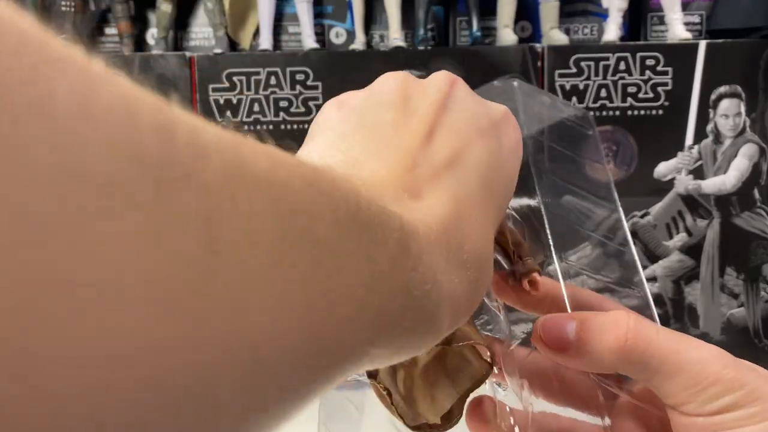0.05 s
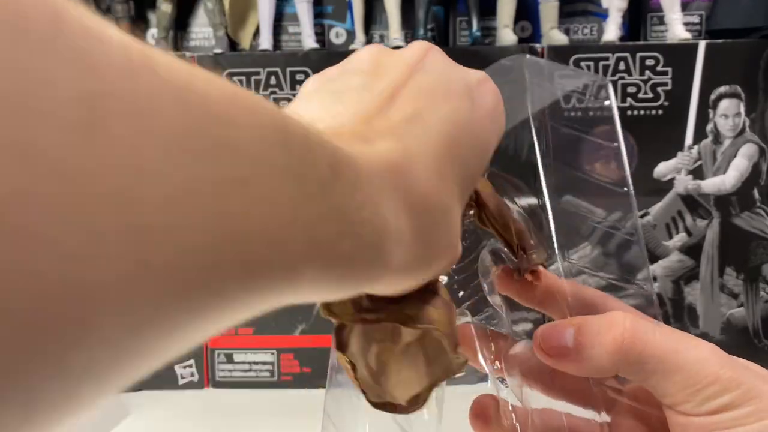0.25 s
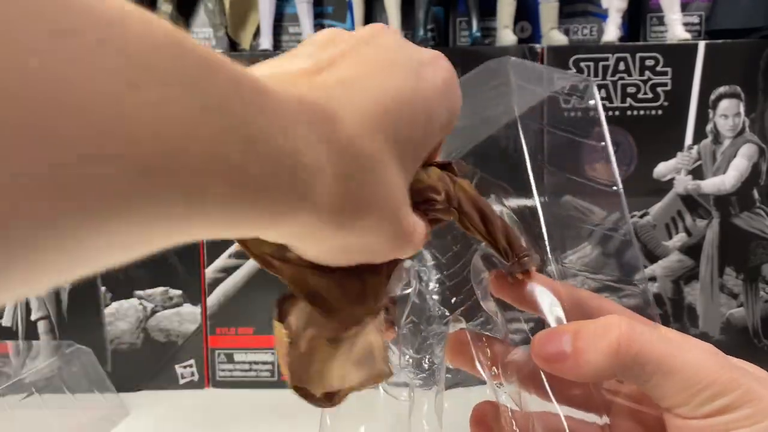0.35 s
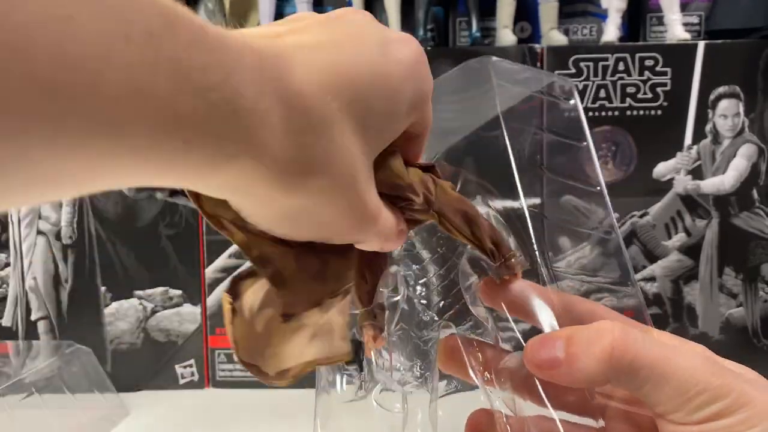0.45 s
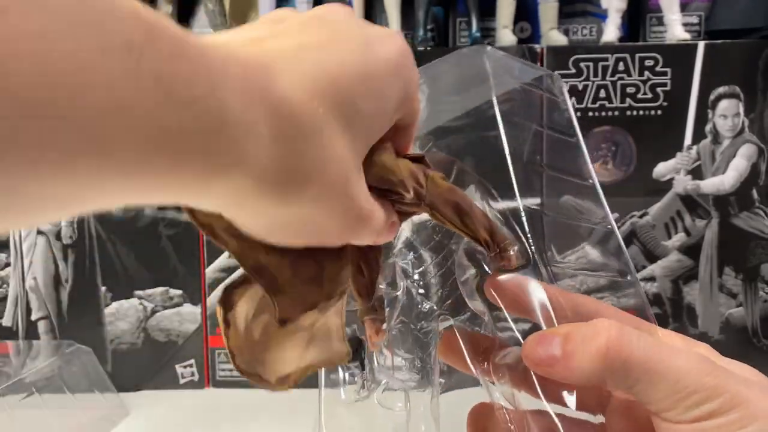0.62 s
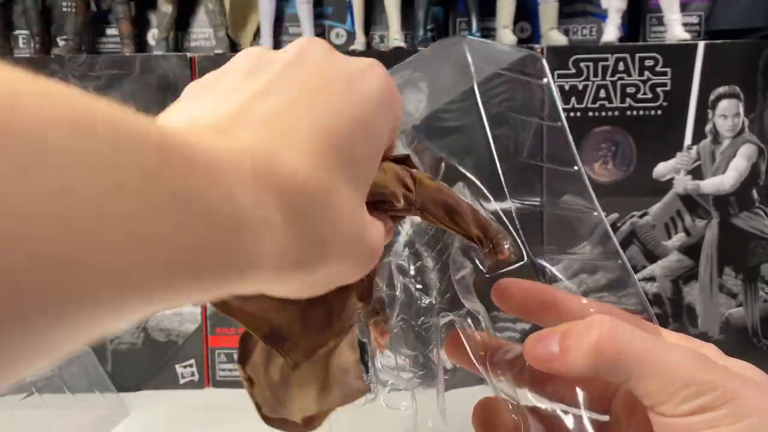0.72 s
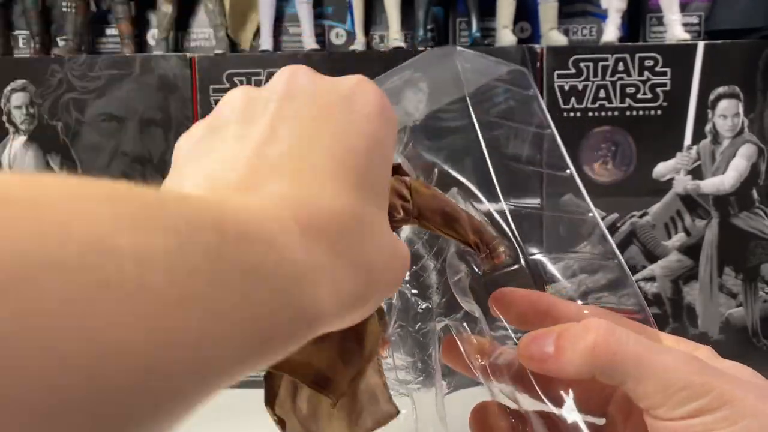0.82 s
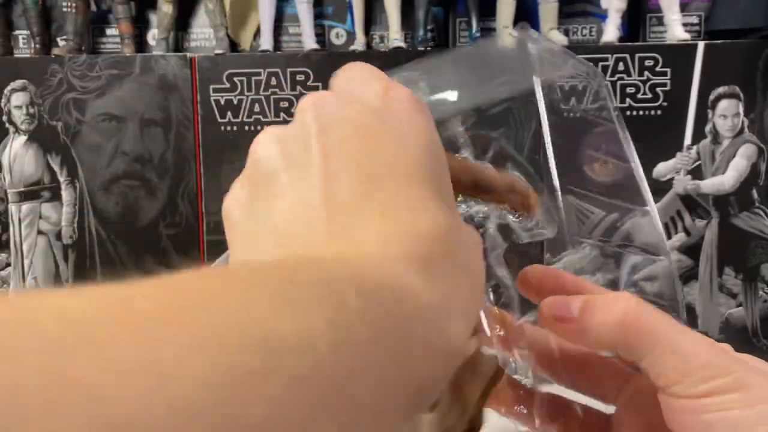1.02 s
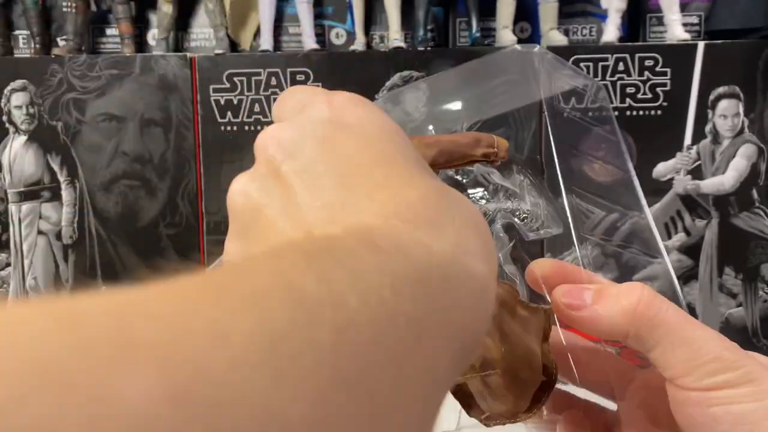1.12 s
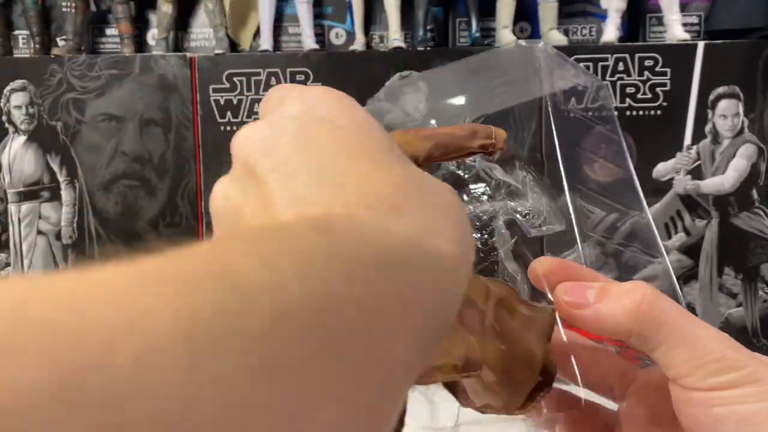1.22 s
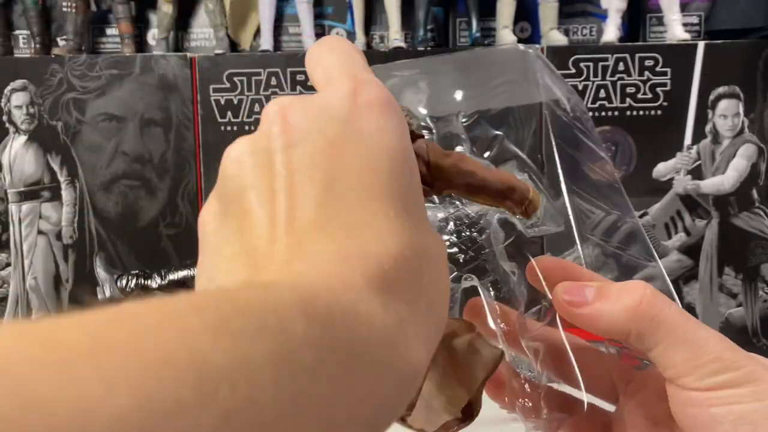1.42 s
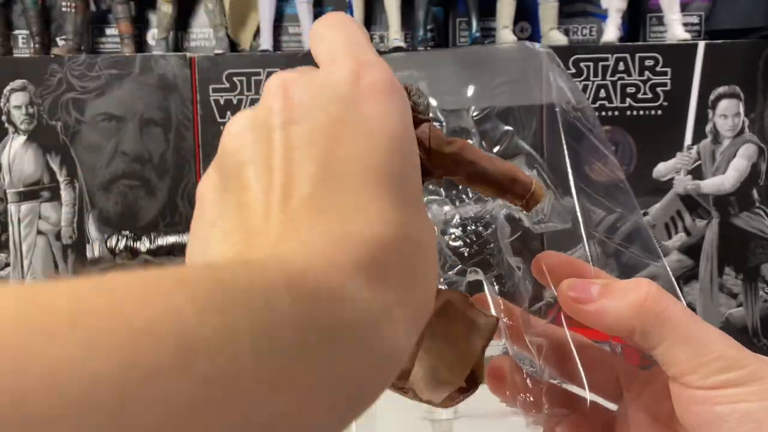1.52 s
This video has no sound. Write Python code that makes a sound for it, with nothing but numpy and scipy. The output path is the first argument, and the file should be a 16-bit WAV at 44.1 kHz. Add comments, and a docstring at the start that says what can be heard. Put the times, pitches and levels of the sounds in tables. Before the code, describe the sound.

A thin, stiff plastic tray crackles close to the microphone in a small quiet room. Faint ticks lead to one hard, by far loudest snap at 0.25 s. Smaller pops follow, crowding with creaks from 0.55 to 1.05 s, with a faint low rubbing drone until about 0.85 s. Then sparse clicks, one clear and bright at 1.25 s, over soft rumble, hum and hiss.

```python
"""A thin clear plastic tray is bent and pulled close to a microphone in a small quiet room.
From the start, dents snap through and ring the tray's modes, the strongest at a quarter second.
Between snaps the sheet creaks in dense tiny slips; after half a second a low rub drones and glides.
The snaps thin out over the last half second. Each sound leaves a room tail, modelled as decaying noise.
Rumble, a low wavering hum and microphone hiss lie underneath throughout."""
import sys
import numpy as np
from scipy import signal
from scipy.fft import rfft, irfft
from scipy.io import wavfile

SR = 44100
rng = np.random.default_rng(int(sys.argv[2]) if len(sys.argv) > 2 else 0)


def to_wav(s):
    """Save 16-bit WAV."""
    ch = np.atleast_2d(s).T  # columns
    pcm = np.round(np.clip(ch, -1, 1) * 32767)  # PCM
    wavfile.write(sys.argv[1], SR, pcm.astype(np.int16))


def linear_from_db(decibels):
    """Turn decibels (scalar or array-like) into linear amplitude factors; 0 gives 1."""
    return 10 ** (np.asarray(decibels, float) / 20)


N = 68355  # samples, 1.55 s

# Dents snapping through. Each row: start in seconds (plus the short delay below), peak of the body ring in dB,
# then hollow ring, upper ring and bright crack in dB over their first 10 ms against that peak.
SNAP_EVENTS = [(0.0014, -53, -38, -15, -18), (0.0184, -46, -14, -22, -2), (0.0224, -42, -10.5, -17, -9),
               (0.0483, -34.5, -15, -39, -20.5), (0.0574, -43, -31, -17, -11),
               (0.0672, -31.5, -17, -16, -18), (0.1231, -45, -7, -8.5, -22), (0.1416, -35, -11, -35, -25),
               (0.17, -33, -14, -12.5, -18.5), (0.2019, -29, -24, -18, -19.5),
               (0.2433, -2.5, -30, -12.5, -17), (0.2764, -33, -51, -13, 5), (0.2844, -40.5, -31, 7, 9.5),
               (0.3654, -29.5, -22.5, -2, -2.5), (0.3935, -18.5, -10.5, -16.5, -31),
               (0.3974, -33, -5.5, 1.5, -13), (0.4384, -38, -22, -16, -12.5),
               (0.5033, -39.5, -13.5, -14, -17.5), (0.5544, -29, -7, -17, -29),
               (0.5641, -24.5, -10.5, -43, -28), (0.5931, -33.5, -12, -15, -15),
               (0.6045, -19.5, -12.5, -9.5, -14.5), (0.6454, -31, -11.5, -15, -14.5),
               (0.6564, -25.5, -21.5, -29, -22.5), (0.6724, -36, -16, -20, -17),
               (0.7332, -36.5, -13, -25, -38), (0.7502, -37, -15, -19.5, -26),
               (0.7637, -32.5, -9.5, -15, -25), (0.7766, -32.5, -10, -23, -32),
               (0.787, -40.5, -7, -26, -19), (0.7991, -27, -11, -16, -28), (0.8074, -26.5, -18, -23, -16.5),
               (0.823, -19, -30, -35, -48), (0.8324, -29, -19, -35, -44),
               (0.8819, -17.5, -25.5, -15.5, -42.5), (0.9173, -28, -14.5, -9, -11.5),
               (0.9316, -21, -10.5, -11, -12), (0.9474, -31, -16, -24, -19),
               (0.9654, -34.5, -12, -31.5, -46), (0.9862, -49.5, 7, -1.5, -33),
               (1.0246, -22.5, -23, 0, -5.5), (1.0404, -35, -3, -3, -8), (1.2516, -19.5, -9.5, -9, 0.5),
               (1.2814, -46.5, -32, -2, -24), (1.3828, -37.5, -8, -10.5, -5.5),
               (1.4067, -30.5, -9, -28, -35), (1.4576, -36, -2.5, -8, -3.5),
               (1.4855, -27.5, -21, -16.5, -18.5)]
# Tray modes in three families, low to high. Each row: pitch in Hz, relative level in dB, t60 in seconds.
HOLLOW_MODES = [(361, -10, 0.082), (490, -18.5, 0.033), (564, 23.5, 0.015), (604.8, 22.5, 0.019),
                (720, 20.5, 0.01)]
BODY_MODES = [(1339, -5.5, 0.033), (1384, -4, 0.0074), (1573.6, 13, 0.0088), (1690, -8.5, 0.0058),
              (1858, 5.5, 0.01)]
UPPER_MODES = [(2172, 7, 0.049), (2450, 21, 0.011), (2706, 22, 0.0057), (3184, 13, 0.012),
               (3570, 5.5, 0.016)]
# Colour of the bright crack. Each row: frequency in Hz, relative density in dB per Hz.
CRACK_COLOUR = [(2120, -13), (3600, -11.5), (4260, 0), (6390, 2), (7200, -3.5), (8900, -9.5),
                (14400, -25.5), (16000, -40)]


def snaps():
    """Each snap is a quick cluster of slips that rings three mode families and sets off a bright crack."""
    delay_s, burst_s, slip_count = 0.0005, 0.003, 14
    longer_per_db = 0.025  # share of burst length added per dB below full scale: softer snaps drag on
    afterslip_db = -8  # later slips against the first, in a full-scale snap
    cleaner_per_db = 0.4  # dB the later slips grow for each dB a snap is softer
    size = 4096
    out = np.zeros(N + 8192)
    for start_s, db, hollow_db, upper_db, crack_db in SNAP_EVENTS:
        chance = rng.standard_normal(64 + size)  # slip sizes, three strikes on the modes, crack noise
        mean_lag_s = burst_s * (1 - longer_per_db * db)
        lags = np.r_[0, mean_lag_s * rng.exponential(size=slip_count)]
        later = linear_from_db(afterslip_db - cleaner_per_db * db) * chance[:slip_count]
        slip_sizes = np.r_[1, later * np.exp(-lags[1:] / mean_lag_s)]
        burst = np.zeros(size)
        np.add.at(burst, np.minimum(lags * SR, 1023).astype(int), slip_sizes)

        hollow, body, upper = (signal.fftconvolve(ring(modes, chance[k:k + 16]), burst)[:size]
                               for modes, k in ((HOLLOW_MODES, 16), (BODY_MODES, 32), (UPPER_MODES, 48)))
        bright = crack(burst, chance[64:], CRACK_COLOUR)
        snap = body / np.abs(body).max()
        for part, part_db in ((hollow, hollow_db), (upper, upper_db), (bright, crack_db)):
            early_peak = np.sqrt(2 * np.mean(part[:SR // 100] ** 2))  # peak of a sine of equal power
            snap = snap + part / early_peak * linear_from_db(part_db)
        i = int((start_s + delay_s) * SR)
        out[i:i + size] += snap * linear_from_db(db)
    return out[:N]


def ring(modes, chance, size=4096):
    """Impulse response of a mode family; where the sheet is struck shifts levels and pitches."""
    scatter_db, detune, rise_s = 2, 0.015, 0.00033  # spread of levels, spread of pitches as a share, onset
    low_edge = 0.85  # a thin sheet radiates little below this share of the family's lowest mode
    hz, db, t60 = np.array(modes, float).T[:, :, None]
    level_chance, pitch_chance = chance[:len(modes), None], chance[8:8 + len(modes), None]
    t = np.arange(size) / SR
    envelopes = linear_from_db(db + scatter_db * level_chance - 60 * t / t60)
    tones = np.sin(2 * np.pi * hz * (1 + detune * pitch_chance) * t)
    response = (envelopes * tones).sum(0) * (1 - np.exp(-t / rise_s))
    high_pass = signal.butter(4, low_edge * hz.min(), "high", fs=SR, output="sos")
    return signal.sosfilt(high_pass, response)


def crack(slips, noise, table):
    """Countless high modes together: every slip sets off a bright noise that dies fast."""
    t60_s, low_edge_hz = 0.02, 1800
    fade = linear_from_db(-120 * np.arange(2048) / SR / t60_s)  # fade of power, so twice the dB
    power = np.maximum(signal.fftconvolve(slips ** 2, fade / fade.sum())[:len(noise)], 0)
    high_pass = signal.butter(3, low_edge_hz, "high", fs=SR, output="sos")
    return signal.sosfilt(high_pass, unit(colour(noise, table)) * np.sqrt(power))


# Creak under the hands. Each row: time in seconds, level in dB, then hollow ring and bright rustle
# in dB against that level.
CREAK_PATH = [(0, -48.5, -10.5, -9.5), (.09, -60, 6.5, -4.5), (.11, -52, -3.5, -12), (0.228, -56, 11, -2),
              (.33, -56.5, 0, -47), (.44, -53, -2, 1), (.47, -54.5, -1, -9), (.54, -58, -1, -9.5),
              (.57, -49.5, 0.5, -18), (0.678, -42.5, -4, -13), (0.719, -60, 3, -7), (.78, -57, 2, -24),
              (.81, -37.5, 0.5, -15), (.845, -56.5, 8.5, -12), (0.868, -67.5, 14, 7),
              (0.948, -42.5, 1, -8.5), (1.01, -57, 4, -10.5), (1.091, -74, 16, -6), (1.17, -69.5, -3, -2),
              (1.228, -50.5, -6.5, 0.5), (1.33, -53.5, -5, 3), (1.401, -50, -0.5, 3),
              (1.55, -52.5, -12.5, 3)]
# Colour of the fine rustle in the creak. Each row: frequency in Hz, relative density in dB per Hz.
RUSTLE_COLOUR = [(3500, -3.5), (5000, -4), (7000, -3.5), (9000, -14), (16000, -31.5)]


def creak():
    """Dense stick-slip ticks of very uneven size ring the same tray."""
    ticks_per_s, spread_db, upper_db = 2700, 2.5, -9
    t = np.arange(N) / SR
    times, *paths = np.array(CREAK_PATH, float).T
    level_db, hollow_db, bright_db = (np.interp(t, times, path) for path in paths)

    def ticks(db):
        """Random signed slips following the creak level."""
        when, sign, size = rng.random((3, N))
        slips = np.sign(sign - 0.5) * linear_from_db(-spread_db * np.log(size + 1e-4))
        return unit((when < ticks_per_s / SR) * slips) * linear_from_db(level_db + db)

    out = crack(ticks(bright_db), rng.standard_normal(N), RUSTLE_COLOUR)
    for modes, db in ((HOLLOW_MODES, hollow_db), (BODY_MODES, 0), (UPPER_MODES, upper_db)):
        response = ring(modes, np.zeros(16))  # no scatter: the nominal modes
        response = response / np.sqrt(np.sum(response ** 2))
        out = out + signal.fftconvolve(ticks(db), response)[:N]
    return out


# Low rub against the tray wall. Each row: time in seconds, pitch in Hz, level in dB.
RUB_PATH = [(.55, 440, -50), (0.602, 371, -49.5), (0.661, 404.3, -43.5), (.72, 393, -48.5),
            (0.801, 422.6, -75), (.86, 452, -44)]


def rub():
    """Narrow rough drone of rubbing whose pitch and level glide."""
    width_hz, fade_s = 35, 0.017
    t = np.arange(N) / SR
    times, hz, db = np.array(RUB_PATH, float).T
    fade = np.clip(np.minimum(t - times[0], times[-1] - t) / fade_s, 0, 1)
    phase = 2 * np.pi * np.cumsum(np.interp(t, times, hz)) / SR
    return waver(width_hz, phase) * linear_from_db(np.interp(t, times, db)) * fade


def waver(width_hz, phase):
    """A tone whose size and phase wander within a bandwidth."""
    low_pass = signal.butter(2, width_hz / 2, fs=SR, output="sos")
    # the first half is dropped so that the filter has settled
    a, b = (unit(signal.sosfilt(low_pass, rng.standard_normal(2 * N))[N:]) for _ in range(2))
    return a * np.cos(phase) + b * np.sin(phase)


def room(x):
    """Near surfaces answer quickly, the walls linger faintly: two decays of noise after a short gap."""
    gap_s = 0.0026
    early_t60_s, early_db = 0.11, -9.5
    late_t60_s, late_db = 0.75, -28
    t = np.arange(SR // 2) / SR
    shape = np.zeros(len(t))
    for t60_s, db in ((early_t60_s, early_db), (late_t60_s, late_db)):
        decay = linear_from_db(-60 * t / t60_s) * (t > gap_s)
        shape += linear_from_db(db) * decay / np.sqrt(np.sum(decay ** 2))
    return x + signal.fftconvolve(x, shape * rng.standard_normal(len(t)))[:N]


# Colour of rumble and hiss. Each row: frequency in Hz, relative density in dB per Hz.
FLOOR_COLOUR = [(6, -1.5), (25, -1.5), (45, -12), (75, -17), (140, -17.5), (250, -18), (600, -40.5),
                (1500, -28), (4000, -41), (10000, -42), (16000, -44)]


def background():
    """Rumble and hiss are one coloured noise, with a wavering hum beside it."""
    floor_db = -57
    hum_hz, hum_db, hum_width_hz = 60, -60, 10
    hum = waver(hum_width_hz, 2 * np.pi * hum_hz * np.arange(N) / SR) * linear_from_db(hum_db)
    floor = unit(colour(rng.standard_normal(N), FLOOR_COLOUR)) * linear_from_db(floor_db)
    return floor + hum


def unit(x):
    """Scale to rms 1."""
    return x / np.sqrt(np.mean(x ** 2))


def colour(x, table):
    """Filter by (Hz, dB) points, joined along log frequency."""
    hz, db = np.array(table, float).T
    f = np.maximum(np.arange(len(x) // 2 + 1) * SR / len(x), 1)
    gain = linear_from_db(np.interp(np.log(f), np.log(hz), db))
    return irfft(rfft(x) * gain, len(x))


def scene():
    """Tray in the room over the background."""
    tray = snaps() + creak() + rub()
    return (room(tray) + background())[None]


def roll_off(x):
    """The treble ends steeply here."""
    return signal.sosfilt(signal.butter(12, 16660, fs=SR, output="sos"), x)


def record(dry):
    """The recorder cuts the top and stops at full scale."""
    top_hz = 16000
    low_pass = signal.butter(6, top_hz, fs=SR, output="sos")
    mix = np.clip(signal.sosfilt(low_pass, dry), -1, 1)
    return roll_off(mix)


dry = scene()
out = record(dry)
to_wav(out)
```